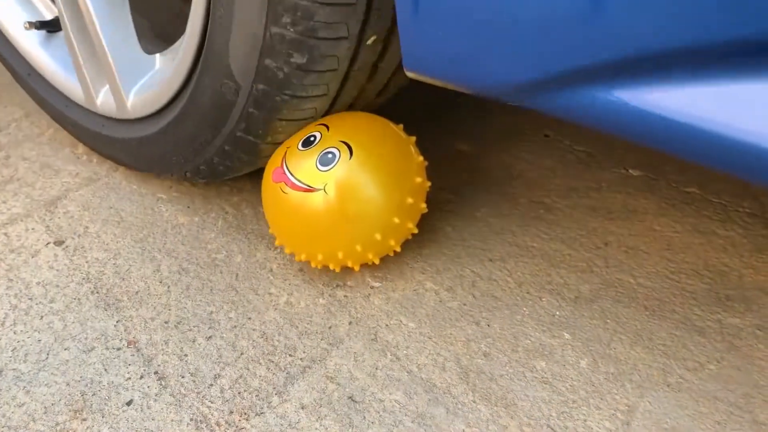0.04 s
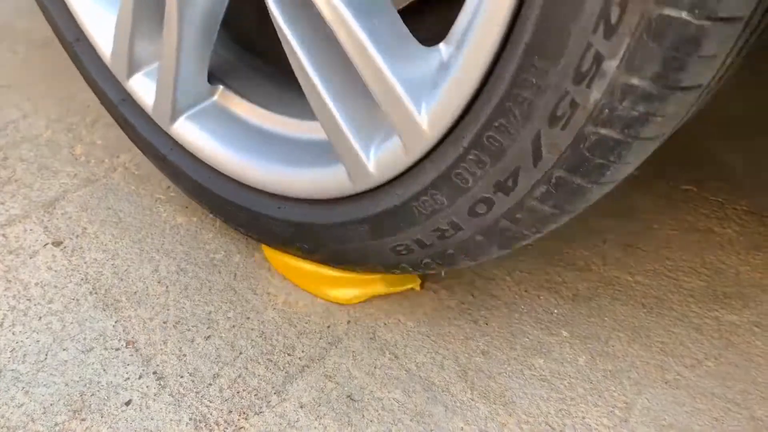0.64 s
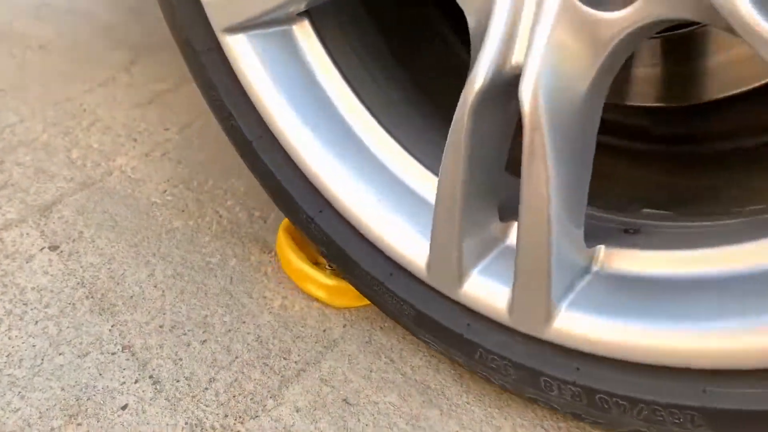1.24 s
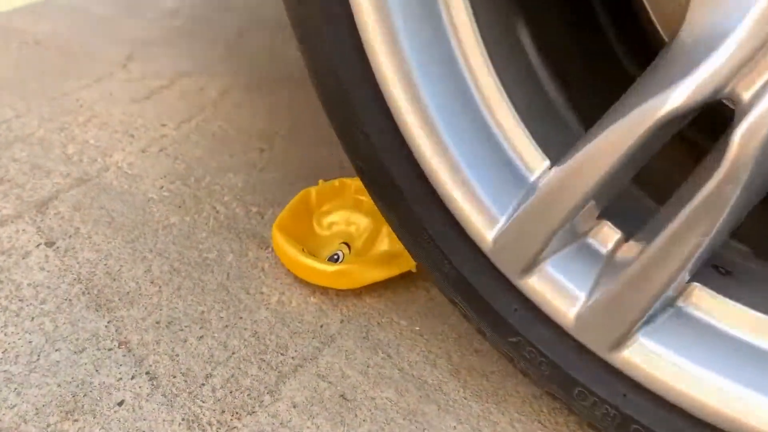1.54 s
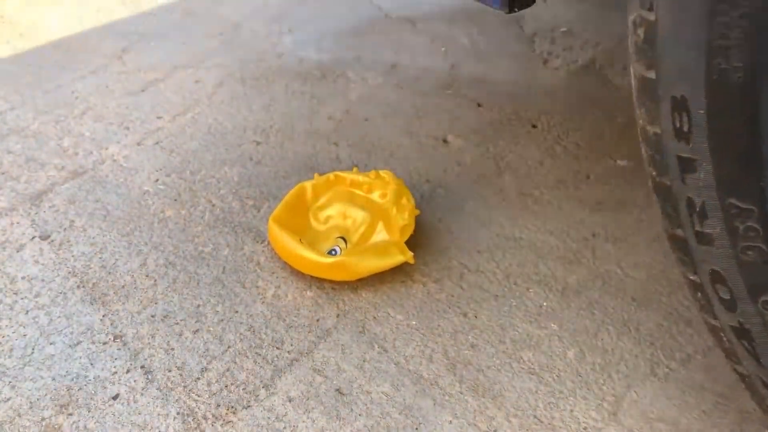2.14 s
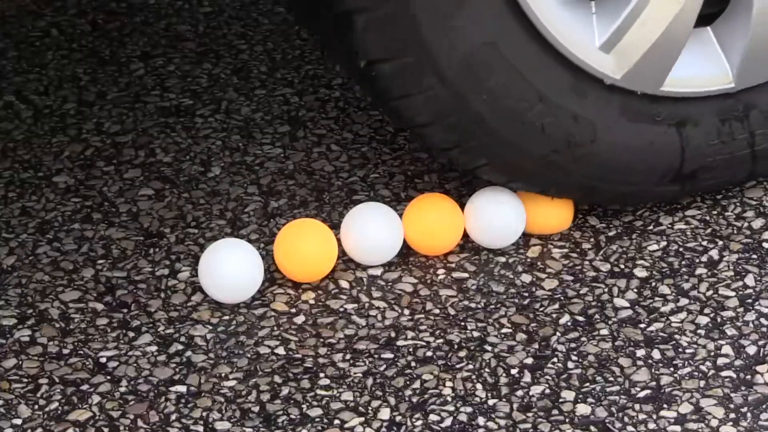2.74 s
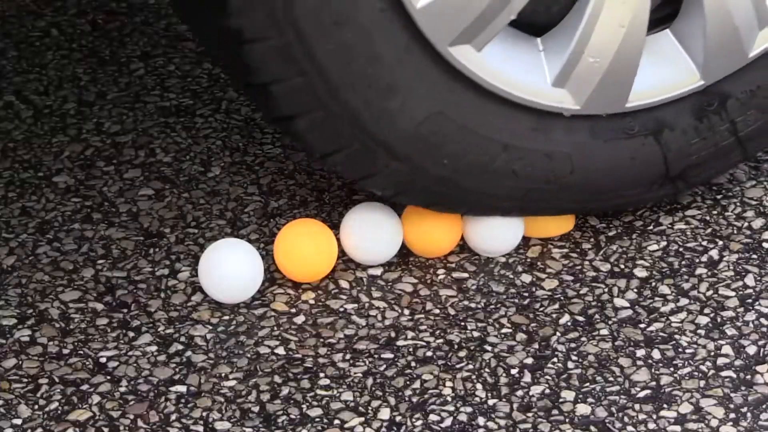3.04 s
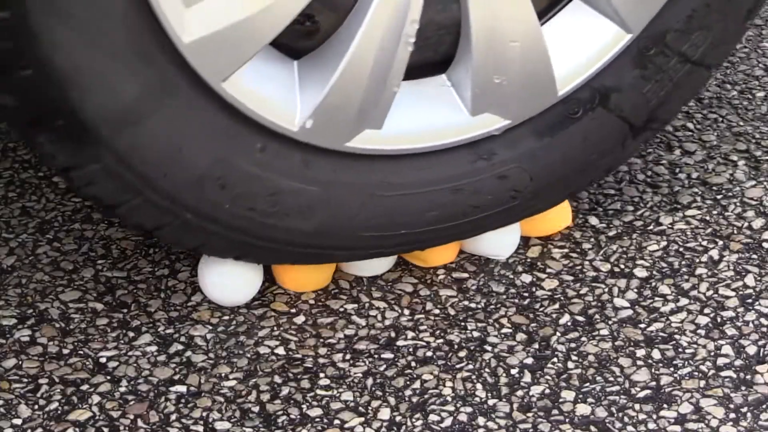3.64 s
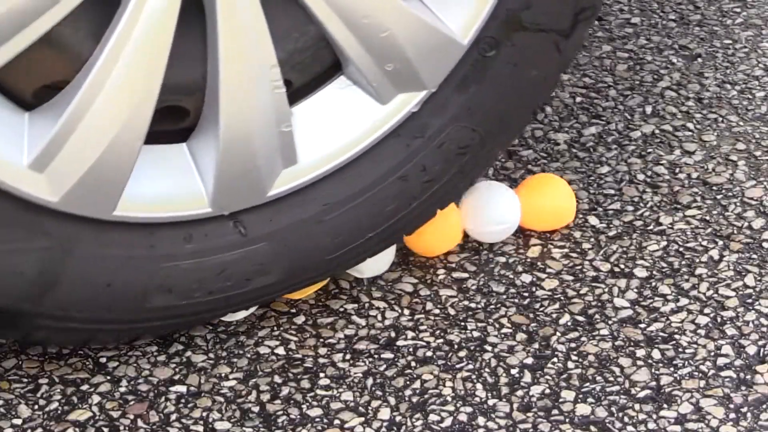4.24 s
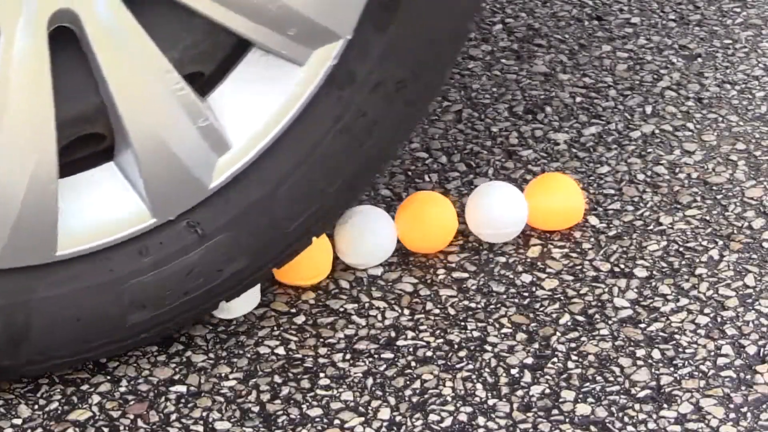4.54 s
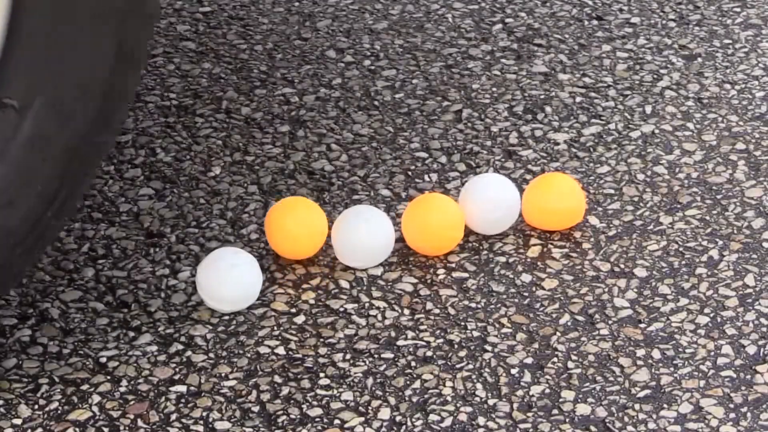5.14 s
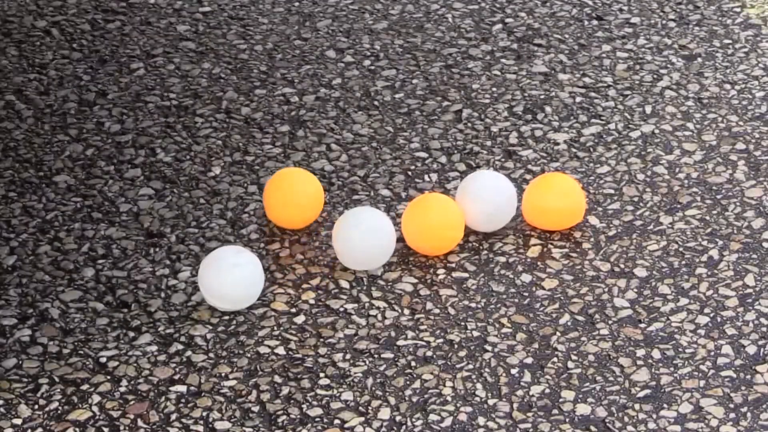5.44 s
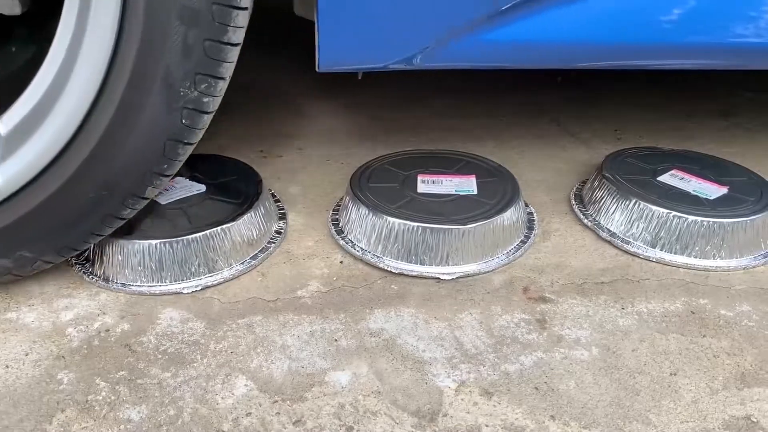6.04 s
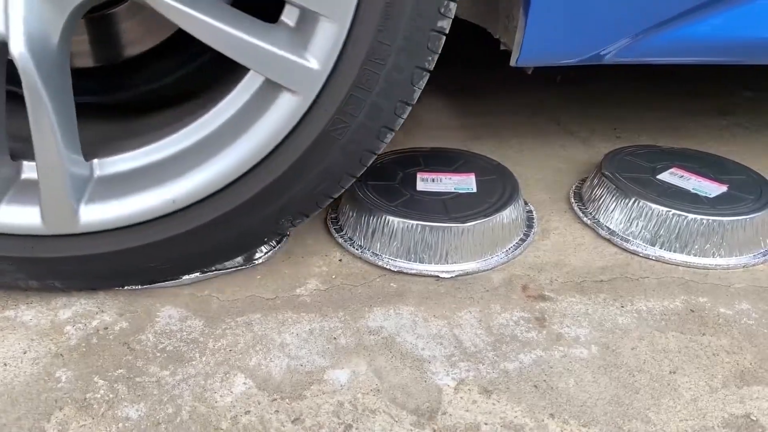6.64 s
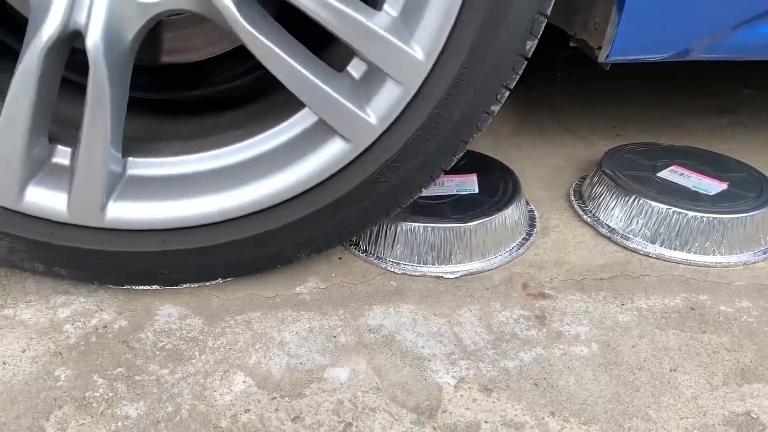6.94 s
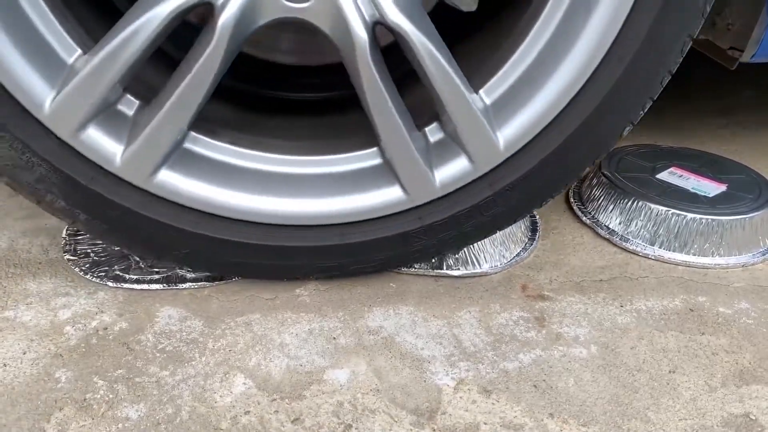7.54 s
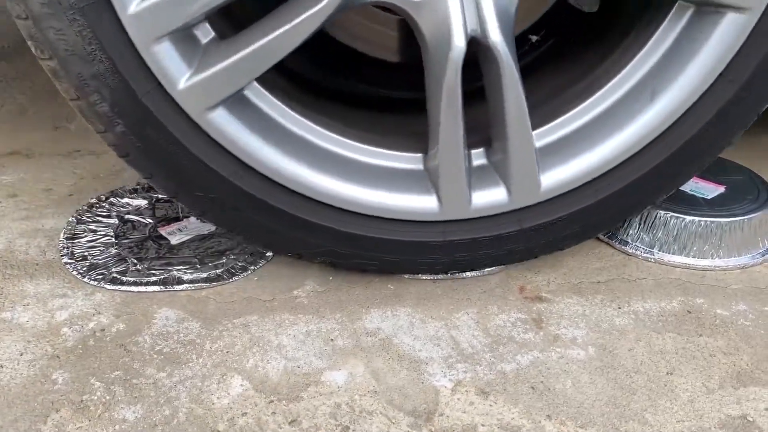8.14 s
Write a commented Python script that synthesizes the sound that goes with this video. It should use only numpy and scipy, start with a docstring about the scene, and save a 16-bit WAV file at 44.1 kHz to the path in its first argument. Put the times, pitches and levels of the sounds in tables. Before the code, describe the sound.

A slowly rolling car tyre crushes three things in turn, heard outdoors from near the ground. First an inflatable ball pops and blows out its air beside the idling engine. Next a row of table-tennis balls gives sharp, hollow cracks and softer clicks as the shells spring back, slightly to the left. Finally foil trays crumple with dense metallic snaps and crinkling over an engine idle. Abrupt cuts join the three parts.

```python
"""A car tyre creeps over three things in turn, outdoors, the microphone close to the ground.
An inflatable ball bursts and blows out its air beside the idling engine. A row of table-tennis balls
cracks and springs back on asphalt, in stereo and a little to the left. Then foil trays buckle, crease
and crinkle while an engine idles again. Hard cuts join the three; the first and last are mono."""
import sys
import numpy as np
from scipy import signal
from scipy.fft import rfft, irfft, next_fast_len
from scipy.io import wavfile

SR = 44100
rng = np.random.default_rng(int(sys.argv[2]) if len(sys.argv) > 2 else 0)


def store_pcm(level_fs):
    """Save levels as 16-bit WAV."""
    pcm = np.round(np.clip(level_fs, -1, 1) * 32767).astype(np.int16)
    wavfile.write(sys.argv[1], SR, np.atleast_2d(pcm).T)


N = 365588
T = np.arange(N) / SR


def from_db(db):
    """Decibels to gain."""
    return np.exp(np.asarray(db) * (np.log(10) / 20))


def rms_one(x):
    """Scale to an rms of 1."""
    return x / np.sqrt(np.mean(x ** 2) + 1e-20)


def gains_in_time(rows):
    """One gain curve for each level column of (time [s], level [dB], ...)."""
    times, *columns = np.transpose(rows)
    return [from_db(np.interp(T, times, levels)) for levels in columns]


def add(out, s, sound):
    """Mix a sound in at time s."""
    start = int(s * SR)
    out[start:start + len(sound)] += sound[:max(N - start, 0)]


def band(x, low_hz, high_hz, order=2):
    """Causal band-pass."""
    edges = [low_hz, min(high_hz, .45 * SR)]
    return signal.sosfilt(signal.butter(order, edges, "band", fs=SR, output="sos"), x)


def coloured(x, colour):
    """Give a steady sound a spectrum that falls away beyond its ends; rms 1."""
    hz, db = np.transpose(colour)
    size = next_fast_len(N, True)
    f = np.maximum(np.arange(size // 2 + 1) * SR / size, 1)
    ends = np.minimum(f / hz[0], 1) ** 2 * np.minimum(hz[-1] / f, 1) ** 2
    shape = from_db(np.interp(np.log(f), np.log(hz), db))
    return rms_one(irfft(rfft(x, size) * ends * shape, size)[:N])


def drift(per_s):
    """A random wander around zero, with a spread of about 1."""
    knots = rng.standard_normal(N // 20)
    return np.interp(T * per_s, np.arange(len(knots)), knots)


def swell(s, attack_s, hold_s, t60):
    """An envelope that rises from time s, holds and dies away."""
    out, t = np.zeros(N), T[:SR]
    decay = from_db(-60 * np.maximum(t - attack_s - hold_s, 0) / t60)
    add(out, s, np.minimum(t / attack_s, 1) * decay)
    return out


def grains(per_s, spread_db, clump_db, clumps_per_s=90):
    """Tiny impulses of uneven size that come in clumps."""
    born = rng.random(N) < per_s / SR
    sizes = from_db(spread_db * np.minimum(rng.exponential(1, N), 3) + clump_db * drift(clumps_per_s))
    return born * sizes * rng.choice([-1, 1], N)


def snap(level_db, low_hz, high_hz, tear_t60, rise_t60, evenness=0, order=2):
    """A fracture spreads and dies; level is rms over 5 ms. Evenness: 0 a ragged tear, 1 a clean break."""
    t = T[:SR // 6]
    envelope = from_db(-60 * t / tear_t60) * (1 - from_db(-60 * t / rise_t60))
    spectrum = rfft(rng.standard_normal(len(t)) * envelope)
    force = irfft(spectrum / np.abs(spectrum) ** evenness)[:len(t) // 2]
    sound = band(force, low_hz, high_hz, order)
    return from_db(level_db) * sound / np.linalg.norm(sound) * np.sqrt(SR / 200)


def ring(x, modes, scatter=0):
    """Draw energy into resonances (pitch [Hz], width [Hz], gain [dB]); scatter detunes each by chance."""
    out = x
    for hz, width, db in modes:
        centre = min(hz * np.exp(scatter * rng.standard_normal()), .45 * SR)
        resonator = signal.iirpeak(centre, centre / width, fs=SR)
        out = out + from_db(db) * signal.lfilter(*resonator, x + 1e-18)
    return out * np.linalg.norm(x) / np.linalg.norm(out)


def dying_noise(t60):
    """A burst of noise with unit energy."""
    t = T[:SR // 2]
    burst = rng.standard_normal(len(t)) * from_db(-60 * t / t60)
    return burst / np.linalg.norm(burst)


def reflections(x, near_db, near_t60, far_db, far_t60):
    """Close echoes off ground, wheel and body reach the microphone with a faint tail from farther off."""
    response = from_db(near_db) * dying_noise(near_t60) + from_db(far_db) * dying_noise(far_t60)
    delay = np.zeros(int(0.00195 * SR))
    return signal.fftconvolve(x, np.concatenate([delay, response]))[:N]


def mid_side(mid, side, side_db):
    """Left and right from a mid-side pair."""
    return mid + from_db(side_db) * side * [[1], [-1]]


def tones(lines, waver_hz):
    """Slightly unsteady tones of spinning parts."""
    return sum(np.sqrt(2) * from_db(db) * np.sin(2 * np.pi * np.cumsum(hz + waver_hz * drift(25)) / SR)
               for hz, db in lines)


def engine(levels, orders, clatter, whine, firing_hz, fires_at_s, throb, wander_hz, uneven, smear):
    """Each firing sends out a low exhaust pulse, smeared by the pipe, and swells the mechanical noise."""
    exhaust, mechanical = gains_in_time(levels)
    phase = 2 * np.pi * (np.cumsum(firing_hz + wander_hz * drift(8)) / SR - firing_hz * fires_at_s)
    pulses = sum(from_db(db) * (1 + uneven * drift(18)) * np.cos(k * phase + smear * (k - 2) ** 2)
                 for k, db in orders)
    rattle = coloured(rng.standard_normal(N), clatter) * (1 + throb * np.cos(phase))
    return exhaust * rms_one(pulses) + mechanical * (rattle + tones(whine, waver_hz=13.86))


# the first engine's idle as heard: suddenly softer after the burst, then slowly recovering
# (time [s], exhaust [dB], mechanical noise [dB])
FIRST_IDLE = [(0, -29.5, -36.5), (0.57, -29, -37), (0.62, -39, -55), (0.85, -43, -52), (1.2, -40.5, -49.5),
              (1.75, -39.5, -51.5), (2.42, -34.5, -48)]
# its exhaust harmonics (multiple of the firing rate, relative level [dB])
FIRST_ORDERS = [(1, 0), (2, 0), (3, 1.5), (4, -3.5), (8, -22.5), (9, -15.5)]
# spectra of its clatter, whine and belt (frequency [Hz], relative level [dB])
FIRST_CLATTER = [(60, -7.5), (145, -11.5), (240, -15), (400, -19.5), (800, -23.5), (1400, -26.5),
                 (1900, -25.5), (2900, -28.5), (3700, -29), (4300, -37.5), (6800, -34.5), (9000, -42),
                 (16000, -50)]
FIRST_WHINE = [(233, -15.5), (1001, -16), (1416, -19), (1809, -18), (6750, -27), (9135, -30), (12193, -36)]
BELT_COLOUR = [(1400, -5.5), (1560, -1), (1680, -10), (1850, -1.5), (2100, -2), (2550, 0), (3200, -7),
               (4500, -24), (5950, -14), (6300, -24), (6850, -17), (7600, -27)]


def first_engine():
    """An engine idles evenly beside the ball; its belt rasps along with the mechanical noise."""
    idle = engine(FIRST_IDLE, FIRST_ORDERS, FIRST_CLATTER, FIRST_WHINE, firing_hz=25.91, fires_at_s=.018,
                  throb=0.14, wander_hz=0.031, uneven=0.026, smear=0.218)
    _, mechanical = gains_in_time(FIRST_IDLE)
    rasp = coloured(grains(per_s=1500, spread_db=1.5, clump_db=3.0), BELT_COLOUR)
    return idle + from_db(-7.5) * mechanical * rasp


# ranges of a break's body, crack and fizz (low edge [Hz], high edge [Hz])
FRACTURE_BANDS = [(600, 1360), (1550, 3760), (4700, 12150)]


def fractures(rows, body_t60, crack_t60, fizz_t60, rise_t60, modes=(), scatter=0):
    """Every break has a low body, a crack and a bright fizz; a hollow thing rings with it."""
    out = np.zeros(N)
    body_band, crack_band, (fizz_low, fizz_high) = FRACTURE_BANDS
    for s, body_db, crack_db, fizz_db in rows:
        # a soft break, with less fizz than crack, also reaches less high
        reach = np.clip(from_db(0.53 * (fizz_db - crack_db)), .6, 1)
        body = snap(body_db, *body_band, body_t60, rise_t60, evenness=1)
        crack = snap(crack_db, *crack_band, crack_t60, rise_t60, evenness=0.77)
        fizz = snap(fizz_db, fizz_low, reach * fizz_high, fizz_t60, rise_t60, evenness=1)
        add(out, s, ring(body + crack + fizz, modes, scatter))
    return out


# the ball's skin strains, tears and later crackles (time [s], body [dB], crack [dB], fizz [dB])
SKIN_BREAKS = [(0.5586, -50, -44, -37), (0.5783, -20.5, -20.5, -20.5), (0.5809, -24, -21.5, -27),
               (1.178, -63, -45, -52), (1.218, -48, -48, -69)]
# the torn skin flaps (time [s], level [dB], pitch [Hz])
SKIN_FLAPS = [(0.619, -27, 540), (0.638, -26.5, 1040), (0.642, -29, 520), (0.657, -33, 500),
              (0.679, -30, 480)]


def bursting_ball():
    """The skin tears with a bang and a low boom, then flaps in the escaping air."""
    bang = fractures(SKIN_BREAKS, body_t60=0.012, crack_t60=0.0103, fizz_t60=0.0053, rise_t60=0.00031)
    boom = snap(level_db=-15, low_hz=225, high_hz=624, tear_t60=0.035, rise_t60=0.00091, evenness=1)
    add(bang, 0.578, boom)
    for s, db, hz in SKIN_FLAPS:
        add(bang, s, snap(db, hz / 1.11, hz * 1.21, tear_t60=0.0088, rise_t60=.002))
    return bang + reflections(bang, near_db=-11.5, near_t60=0.037, far_db=-26, far_t60=0.28)


# a puff, a longer rush and a last leak (time [s], attack [s], hold [s], t60 [s], level [dB])
OUTFLOW = [(0.576, .003, .002, 0.07, -24.5), (0.584, 0.04, 0.054, 0.14, -29),
           (0.68, 0.022, 0.066, .8, -43.5)]
# spectrum of the escaping air (frequency [Hz], relative level [dB])
RUSH_COLOUR = [(35, -42), (60, -7), (135, 2.5), (229, -4.5), (418, -4), (577, -5.5), (1130, -15.5),
               (1390, -21), (5060, -23.5), (15000, -42)]


def escaping_air():
    """Air flutters out through the split in the ball."""
    flow = sum(from_db(db) * swell(s, attack_s, hold_s, t60) for s, attack_s, hold_s, t60, db in OUTFLOW)
    return flow * coloured(rng.standard_normal(N), RUSH_COLOUR) * from_db(2 * drift(110))


# the air over the asphalt (time [s], level [dB])
STREET_LEVELS = [(2.45, -51.5), (3.79, -50), (5.5, -47.5)]
# spectra of that air and of the car's hum (frequency [Hz], relative level [dB])
STREET_COLOUR = [(24, -71), (40, -22), (64, -2.5), (145, 0.5), (206, -2.5), (244, -1.5), (306, -3),
                 (422, -4), (554, -9), (1060, -6), (1780, -18), (2640, -19.5), (5290, -30), (7490, -28.5),
                 (15000, -43)]
CAR_HUM = [(242.2, -60)]


def street():
    """A low outdoor rumble, wider above the bass; the quiet car's hum fades as it moves on."""
    mid, side = [coloured(rng.standard_normal(N), STREET_COLOUR) for _ in range(2)]
    air = mid_side(mid, band(side, 1040, 7400, order=1), side_db=0.5)
    hum = gains_in_time([(3.0, 3.0), (4.5, -2.0)])[0] * tones(CAR_HUM, waver_hz=2.6)
    return gains_in_time(STREET_LEVELS)[0] * air + hum


# grit under the rolling tread (time [s], level [dB])
GRIT_LEVELS = [(2.45, -57), (2.95, -59), (3.2, -52), (3.65, -59.5), (4.15, -56), (4.45, -53), (4.85, -51),
               (5.05, -61)]
# a dented shell drags on the asphalt (time [s], length [s], grit [dB], splinters [dB])
SCRAPES = [(3.331, 0.059, -56, -47.5), (3.375, 0.076, -50.5, -45.5), (4.153, .037, -53, -71),
           (4.326, 0.048, -42.5, -42), (5.121, 0.065, -47, -66), (5.313, 0.022, -46, -68)]


def grinding(rolled_off_s=4.62, fade_db_per_s=31):
    """Grit and splinters grind under the tread; the splinters fade once the tyre leaves the last ball."""
    grit_gain = gains_in_time(GRIT_LEVELS)[0]
    splinter_gain = from_db(-61.5 - fade_db_per_s * np.maximum(T - rolled_off_s, 0))
    for s, length, grit_db, splinter_db in SCRAPES:
        drag = np.hanning(int(length * SR))
        add(grit_gain, s, from_db(grit_db) * drag)
        add(splinter_gain, s, from_db(splinter_db) * drag)
    grit = coloured(grains(per_s=2200, spread_db=5.6, clump_db=2.5),
                    [(700, 0.5), (1500, 0), (2800, 3), (4500, -19)])
    splinters = coloured(grains(per_s=890, spread_db=1.2, clump_db=9.8),
                         [(3500, 4.5), (7500, 6), (12000, 1.5), (15000, -10)])
    return grit_gain * grit + splinter_gain * splinters


# table-tennis shells crack and spring back (time [s], body [dB], crack [dB], fizz [dB])
SHELL_CRACKS = [(2.6934, -24, -19.5, -17), (2.6989, -29, -29, -30), (2.826, -53, -31, -35.5),
                (3.1753, -34.5, -27.5, -26), (3.2096, -36, -24, -26), (3.2606, -34.5, -25, -27),
                (3.2922, -22.5, -18, -23.5), (3.7673, -45, -41.5, -50), (3.7839, -62, -52, -37),
                (3.7936, -60, -44, -33.5), (3.8735, -58, -47, -39), (4.0305, -50, -34, -38.5),
                (4.1095, -53, -46, -40.5), (4.2301, -47, -41, -47.5), (4.2958, -47, -39, -34.5),
                (4.3592, -41, -49, -63), (4.6153, -52, -43, -50), (4.6312, -31.5, -31, -51),
                (4.7571, -45, -43, -66), (4.8283, -40.5, -45, -65), (4.846, -46, -46, -60),
                (4.8937, -31, -34, -40.5), (5.1468, -46, -46, -66), (5.4257, -46, -69, -50.5)]
# shell resonances, rung by every crack (pitch [Hz], width [Hz], gain [dB])
SHELL_MODES = [(1040, 40, 4), (2580, 22, -4), (3620, 56, 2), (7750, 61, 1), (8560, 500, 0.5),
               (11700, 200, 3)]
# trapped air thumps out of a collapsing ball (time [s], level [dB], pitch [Hz])
AIR_THUMPS = [(2.694, -40, 700), (2.705, -32.5, 233), (3.292, -27, 616), (3.767, -34, 234)]
# a shell that is still hollow rings on (time [s], pitch [Hz], level [dB], t60 [s])
SHELL_RINGS = [(2.823, 2680, -26.5, 0.035), (2.826, 2810, -31.5, 0.099), (2.825, 2400, -22, 0.016),
               (4.6319, 2200, -13, 0.0068)]


def table_tennis_balls():
    """Thin shells crack one after another, grind under the tread and spring back behind it."""
    shells = fractures(SHELL_CRACKS + split_cracks(), body_t60=0.011, crack_t60=0.012, fizz_t60=0.0027,
                       rise_t60=0.0087, modes=SHELL_MODES, scatter=0.049)
    for s, db, hz in AIR_THUMPS:
        add(shells, s, snap(db, hz / 2, hz * 2.3, tear_t60=0.045, rise_t60=0.0011))
    t = T[:SR]
    for s, hz, db, t60 in SHELL_RINGS:
        add(shells, s, np.sin(2 * np.pi * hz * t) * from_db(db - 60 * t / t60))
    shells += grinding()
    mid, side = [reflections(shells, near_db=-7.5, near_t60=0.078, far_db=-16.5, far_t60=0.3)
                 for _ in range(2)]
    return shells + mid_side(mid, side, side_db=-4)


# a split runs through a shell (time [s], first step [s], steps,
# crack at start, middle and end [dB], fizz at start, middle and end [dB])
SHELL_SPLITS = [(3.128, .015, 3, -35.5, -34, -30.5, -33.5, -36, -29),
                (3.9143, 0.0072, 13.2, -33, -31, -40, -28.5, -29, -40),
                (3.9909, .0042, 5.2, -30, -31, -32, -17, -25, -29)]


def split_cracks(body_below_db=8, step_ratio=.8, shortest_s=.0025):
    """Rows for fractures(): the small cracks of a split come faster, down to an uneven shortest step."""
    rows = []
    for s, step_s, steps, *course_db in SHELL_SPLITS:
        for progress in np.linspace(0, 1, round(steps)):
            crack_db = np.interp(progress, [0, .5, 1], course_db[:3])
            fizz_db = np.interp(progress, [0, .5, 1], course_db[3:])
            rows.append((s, crack_db - body_below_db, crack_db, fizz_db))
            s += step_s
            step_s = max(step_s * step_ratio, shortest_s * (.5 + rng.random()))
    return rows


# the second engine's idle as heard (time [s], exhaust [dB], mechanical noise [dB])
SECOND_IDLE = [(5.5, -43, -34.5), (5.9, -33, -38), (6.4, -36.5, -34), (7.0, -33, -38.5), (7.6, -34, -39),
               (8.29, -34, -40)]
# its exhaust harmonics (multiple of the firing rate, relative level [dB])
SECOND_ORDERS = [(1, 3), (2, -5.5), (3, 0.5), (4, 0), (5, -2.5), (8, -12.5)]
# spectra of its clatter and whine (frequency [Hz], relative level [dB])
SECOND_CLATTER = [(35, -9), (60, -9), (108, -4), (222, -11.5), (294, -6.5), (480, -25), (636, -17.5),
                  (803, -23), (1400, -22), (2520, -15), (3670, -26), (5330, -28), (14200, -38),
                  (16000, -44)]
SECOND_WHINE = [(1001, -16.5), (2492, -15), (4474, -25)]


def second_engine():
    """Beside the trays an engine idles, slower and less evenly."""
    return engine(SECOND_IDLE, SECOND_ORDERS, SECOND_CLATTER, SECOND_WHINE, firing_hz=23.75,
                  fires_at_s=5.548, throb=0.22, wander_hz=0.275, uneven=0.23, smear=0.353)


def facets(flips, low_hz, high_hz, reach, t60=0.011, kinds=14):
    """Each flip of a foil facet is a brief rattle in one of several bands, a ratio reach either side."""
    dealt = rng.integers(0, kinds, N)
    rattles = [snap(0, hz / reach, hz * reach, t60, rise_t60=0.001) * np.sqrt(hz)
               for hz in np.geomspace(low_hz, high_hz, kinds)]
    out = np.zeros(N)
    for i in np.flatnonzero(flips):
        add(out, i / SR, flips[i] * rattles[dealt[i]])
    return out


# a stretch of pleated wall folds down (time [s], length [s], crunch [dB], crinkle [dB])
WALL_FOLDS = [(5.931, .092, -28, -33.5), (6.084, 0.07, -27, -30.5), (6.306, 0.032, -24, -28.5),
              (6.529, 0.021, -29.5, -34), (6.93, 0.063, -22.5, -30.5), (7.012, 0.064, -27, -36.5),
              (7.218, 0.052, -32.5, -44), (7.366, 0.046, -29, -43), (7.61, 0.065, -31, -37),
              (8.068, 0.016, -42, -30), (8.237, .071, -26, -32.5)]
# spectra of coarse pleats and of the finest wrinkles (frequency [Hz], relative level [dB])
CRUNCH_COLOUR = [(250, -11), (450, -2.5), (640, -3), (900, 0), (1600, -6), (2600, -7.5), (4000, -11.5),
                 (7000, -75)]
CRINKLE_COLOUR = [(1800, -9), (3200, -7.5), (4800, 0.5), (7300, -2.5), (10000, -4.5), (15000, -8)]


def crumpling(first_tray_s=5.925):
    """Once the tyre meets the first tray, foil keeps crumpling under it and surges with every fold."""
    pressed = T > first_tray_s
    crunch, crinkle = pressed * from_db(-36.5), pressed * from_db(-42)
    for s, length, crunch_db, crinkle_db in WALL_FOLDS:
        surge = swell(s, attack_s=0.0042, hold_s=length, t60=0.33)
        crunch = np.maximum(crunch, from_db(crunch_db) * surge)
        crinkle = np.maximum(crinkle, from_db(crinkle_db) * surge)
    coarse_flips = grains(per_s=1500, spread_db=4, clump_db=2, clumps_per_s=130)
    pleats = facets(coarse_flips, low_hz=392, high_hz=3650, reach=1.37)
    fine_flips = grains(per_s=1200, spread_db=3.5, clump_db=2.5, clumps_per_s=130)
    wrinkles = facets(fine_flips, low_hz=2170, high_hz=14700, reach=1.32)
    return crunch * coloured(pleats, CRUNCH_COLOUR) + crinkle * coloured(wrinkles, CRINKLE_COLOUR)


# loud snaps of the foil (time [s], buckle [dB], buckle pitch [Hz], buckle t60 [s], crease [dB])
FOIL_SNAPS = [(5.927, -34, 920, 0.0069, -40), (5.9366, -20, 1880, 0.015, -22.5),
              (5.959, -23.5, 2160, 0.016, -38), (5.982, -23.5, 1570, 0.0094, -34),
              (6.0238, -18.5, 2720, 0.029, -20.5), (6.086, -23, 1890, 0.017, -33),
              (6.12, -18.5, 1850, 0.03, -26), (6.1377, -20, 1620, 0.029, -21),
              (6.148, -21, 1650, 0.033, -17.5), (6.237, -19, 1680, 0.012, -19.5),
              (6.32, -20.5, 2530, .021, -23), (6.332, -17.5, 1590, 0.013, -19.5),
              (6.3476, -20, 1740, .0064, -32), (6.367, -16, 1740, 0.0017, -30),
              (6.3922, -16.5, 1610, 0.014, -18.5), (6.411, -19.5, 1980, 0.022, -18),
              (6.444, -19.5, 2930, 0.019, -21.5), (6.4622, -24, 1780, 0.0087, -19.5),
              (6.49, -21.5, 1555, .016, -25), (6.515, -23.5, 1680, 0.011, -18.5),
              (6.546, -24, 1490, .008, -31), (6.552, -23, 2000, 0.01, -26), (6.617, -17, 1800, 0.0013, -40),
              (6.646, -26.5, 1880, 0.011, -19.5), (6.678, -25, 1680, 0.0034, -35),
              (6.701, -26, 1750, .005, -27.5), (6.7124, -20.5, 1414, .022, -22.5),
              (6.7302, -25.5, 1880, 0.0075, -28.5), (6.744, -26, 2320, 0.015, -36),
              (6.7494, -22, 2490, .0042, -25), (6.774, -23, 2140, .0034, -34),
              (6.783, -27, 2100, .016, -26.5), (6.809, -28, 1760, .012, -29.5),
              (6.871, -26, 2120, .014, -29), (6.894, -25.5, 1800, .012, -29), (6.911, -28, 2220, .008, -19),
              (6.9208, -30, 1980, .008, -30), (6.9281, -25, 2040, .018, -18),
              (6.9513, -27, 1310, .011, -26), (6.99, -20, 2180, .018, -26.5),
              (7.008, -21.5, 1380, 0.0077, -32), (7.06, -23, 2430, .018, -34),
              (7.068, -14.5, 1950, 0.0094, -22), (7.119, -24, 1480, .02, -24),
              (7.193, -20, 1580, 0.0025, -20.5), (7.199, -14.5, 1737, 0.0035, -31.5),
              (7.229, -28, 1700, .012, -29.5), (7.338, -16.5, 1500, 0.0019, -26),
              (7.372, -26, 2030, .016, -39), (7.396, -27, 1680, .014, -23.5),
              (7.429, -21.5, 1870, .025, -44), (7.442, -15, 2375, 0.019, -20.5),
              (7.52, -30, 1950, 0.012, -18.5), (7.561, -24, 1890, .014, -23),
              (7.5761, -15, 2360, 0.032, -18.5), (7.6714, -23, 2410, 0.019, -25.5),
              (7.688, -26, 1900, 0.025, -27), (7.7158, -22.5, 1910, 0.0072, -20),
              (7.779, -15, 2800, 0.0026, -33), (7.789, -31, 2820, .0018, -47),
              (7.8016, -21.5, 3000, 0.0055, -21.5), (7.84, -23.5, 1500, 0.032, -28.5),
              (7.851, -22.5, 2060, 0.0096, -37), (7.8636, -23.5, 2110, .0066, -30.5),
              (7.872, -25, 2210, 0.0045, -39), (7.914, -28, 2370, 0.0035, -34),
              (7.9302, -18.5, 2070, .022, -30), (7.9477, -25, 2010, 0.012, -27),
              (7.964, -24, 2900, 0.014, -22.5), (8.019, -26, 1750, 0.021, -32.5),
              (8.049, -25.5, 1930, .007, -30), (8.0715, -25, 3390, 0.0069, -22),
              (8.1882, -23, 2350, .0062, -25.5), (8.2283, -26.5, 1210, 0.012, -26)]


def buckles_and_creases(buckle_reach=1.61, crease_reach=1.48, panel_q=53, scatter=.11):
    """A panel flips at a pitch set by its size and jolts the wall; a crease at its edge ticks and tears."""
    out = np.zeros(N)
    for s, db, hz, t60, crease_db in FOIL_SNAPS:
        crease_hz, wall_hz = np.array([7200, 0.44 * hz]) * np.exp(scatter * rng.standard_normal(2))
        buckle = snap(db, hz / buckle_reach, hz * buckle_reach, t60,
                      rise_t60=0.0016, evenness=0.29, order=3)
        wall = snap(db - 8.5, wall_hz / buckle_reach, wall_hz * buckle_reach, t60,
                    rise_t60=0.0016, evenness=0.38)
        crease = snap(crease_db, crease_hz / crease_reach, crease_hz * crease_reach,
                      tear_t60=0.01, rise_t60=0.0039)
        tick = snap(crease_db - 5, low_hz=3500, high_hz=14600, tear_t60=0.0019, rise_t60=0.0015)
        panel_modes = [(ratio * hz, ratio * hz / panel_q, 0) for ratio in (.66, 1, 1.5, 2.4, 3.5, 4.6)]
        add(out, s, tick + ring(buckle + wall + crease, panel_modes, scatter))
    return out


# a tray's floor caves in (time [s], level [dB], pitch [Hz])
FLOOR_DENTS = [(5.928, -23.5, 624), (5.938, -28.5, 487), (6.136, -33, 560), (6.334, -22, 880),
               (6.393, -30, 730), (6.413, -24.5, 513), (6.446, -28, 670), (6.713, -25, 850),
               (6.952, -20, 990), (6.974, -23, 910), (7.009, -23, 950), (7.199, -23, 970),
               (7.339, -21.5, 1070), (7.435, -24.5, 655), (7.579, -29, 640), (8.166, -22, 920),
               (8.262, -21, 1150)]


def dents(reach=1.217):
    """The broad floor of a tray gives way with a dull, hollow pop."""
    out = np.zeros(N)
    for s, db, hz in FLOOR_DENTS:
        add(out, s, snap(db, hz / reach, hz * reach, tear_t60=0.014, rise_t60=.002, evenness=0.24))
    return out


# the second tray skids under the tread (time [s], pitch [Hz], level [dB])
SKID_SQUEAKS = [(6.893, 6300, -24), (6.912, 6300, -18.5), (6.92, 7600, -15.5), (6.935, 7300, -19),
                (6.957, 5730, -18)]


def squeaks(reach=1.054):
    """Foil sticks and slips on the rubber, each time at one narrow pitch."""
    out = np.zeros(N)
    for s, hz, db in SKID_SQUEAKS:
        add(out, s, snap(db, hz / reach, hz * reach, tear_t60=0.0049, rise_t60=0.0035))
    return out


# resonances of a whole tray (pitch [Hz], width [Hz], gain [dB])
TRAY_MODES = [(646, 67, 1.5), (1094, 18, -12), (1496, 70, -7.5), (1724, 160, -2.5), (5800, 350, -13),
              (7300, 530, -8)]


def foil_trays():
    """Buckles and creases stand out of a bed of fine crumpling; all of it rings the tray."""
    foil = from_db(0.08) * ring(crumpling() + buckles_and_creases() + dents() + squeaks(), TRAY_MODES)
    return foil + reflections(foil, near_db=-10, near_t60=0.038, far_db=-25, far_t60=1.0)


def scene(shells_from_s=2.423, trays_from_s=5.522):
    """Three set-ups at ground level, cut hard together; the middle one lies a little to the left."""
    ball = first_engine() + bursting_ball() + escaping_air()
    shells = (street() + table_tennis_balls()) * from_db([[1.3], [-1.4]])
    trays = second_engine() + foil_trays()
    return np.where(T < shells_from_s, ball, np.where(T < trays_from_s, shells, trays))


def record(dry):
    """The tallest peaks are rounded and the top of the treble is cut."""
    ceiling, cutoff_hz = 0.8, 16000
    low_pass = signal.ellip(10, .1, 80, cutoff_hz, fs=SR, output="sos")
    return signal.sosfilt(low_pass, ceiling * np.tanh(dry / ceiling))


dry = scene()
out = record(dry)
store_pcm(out)
```